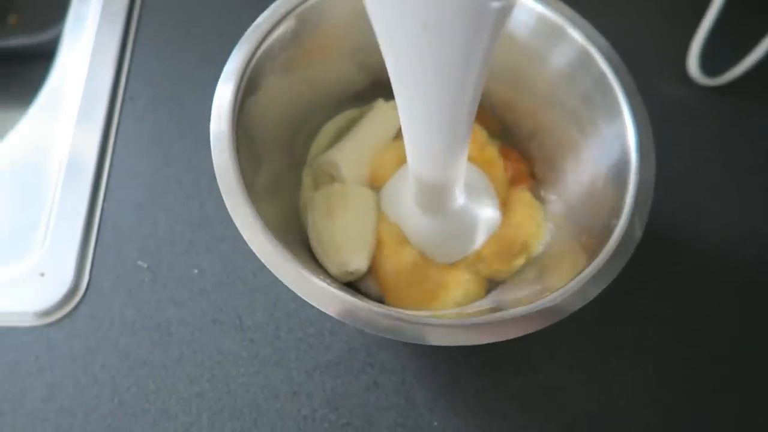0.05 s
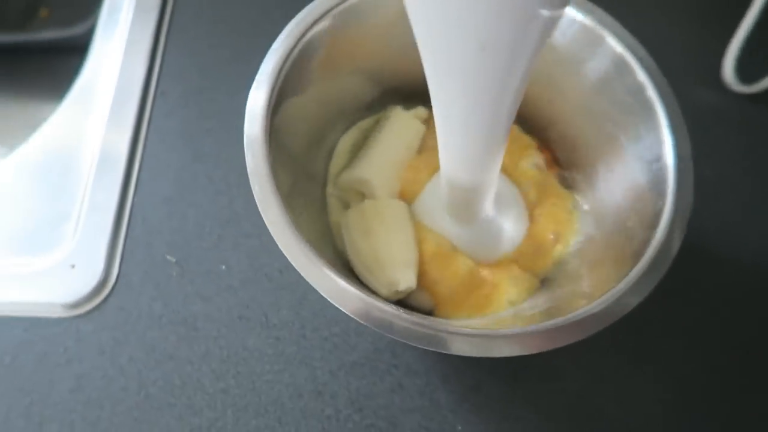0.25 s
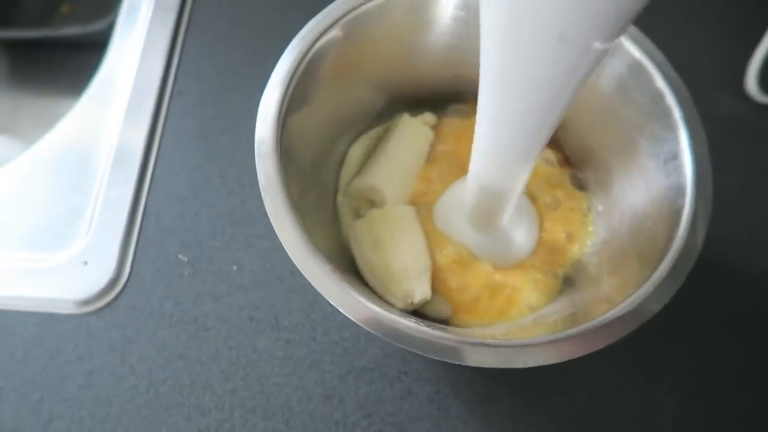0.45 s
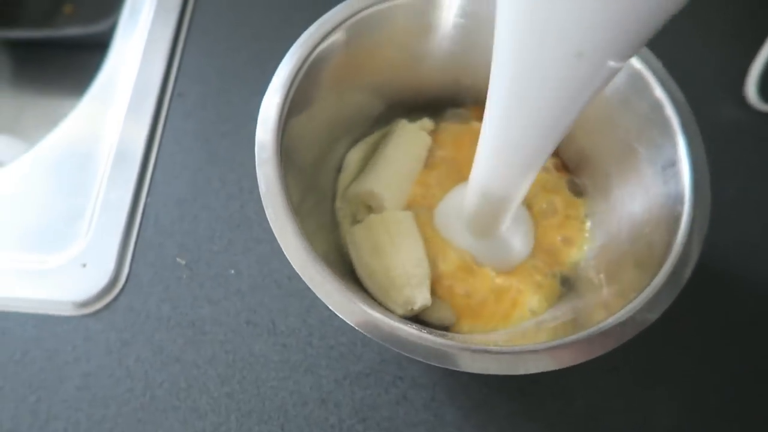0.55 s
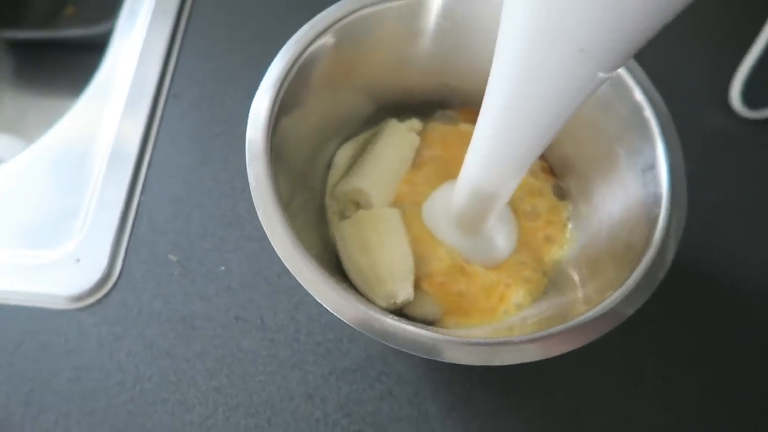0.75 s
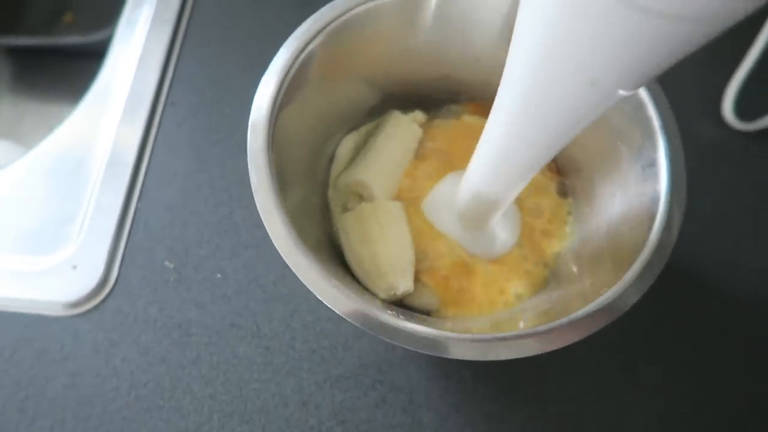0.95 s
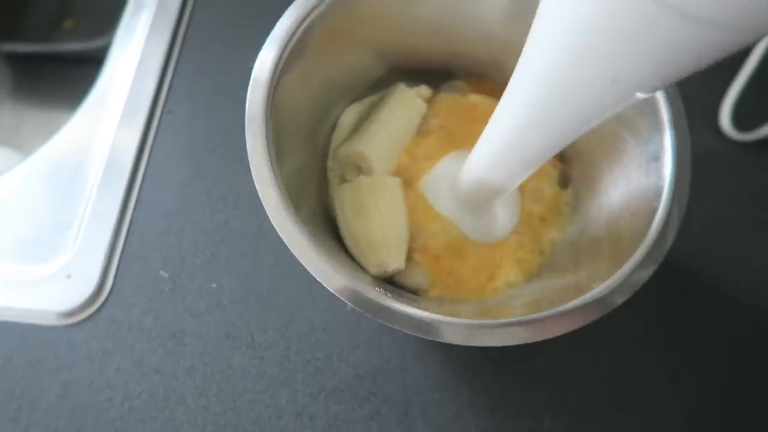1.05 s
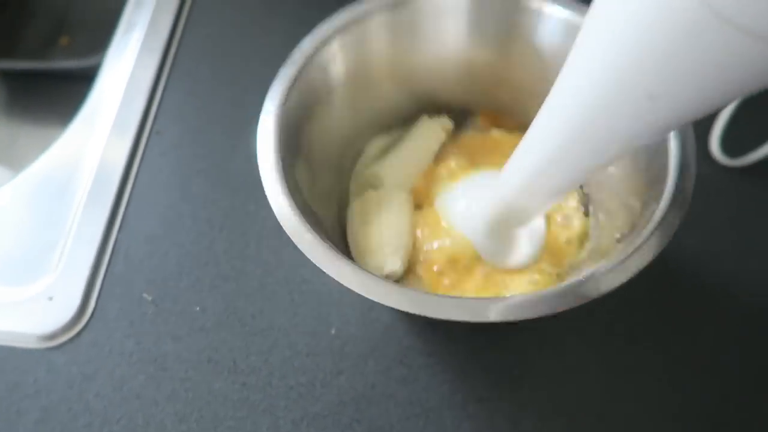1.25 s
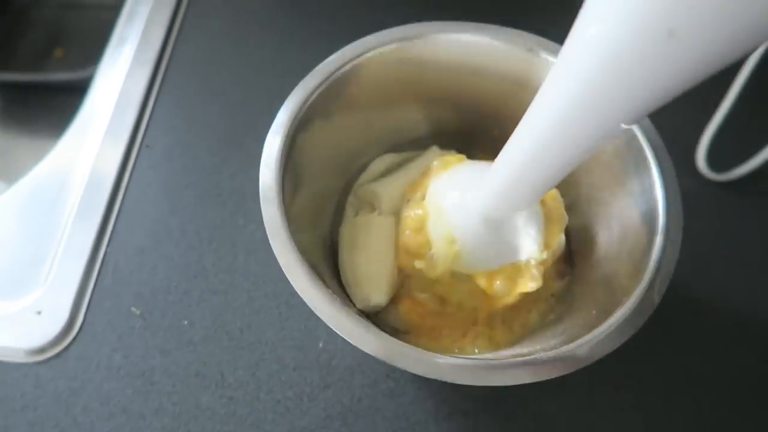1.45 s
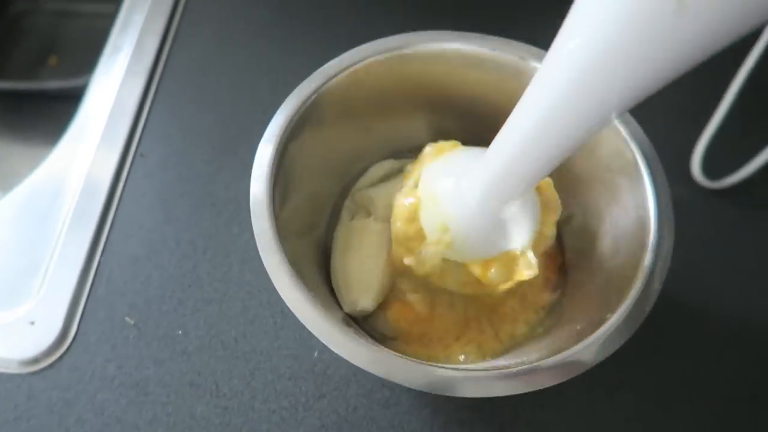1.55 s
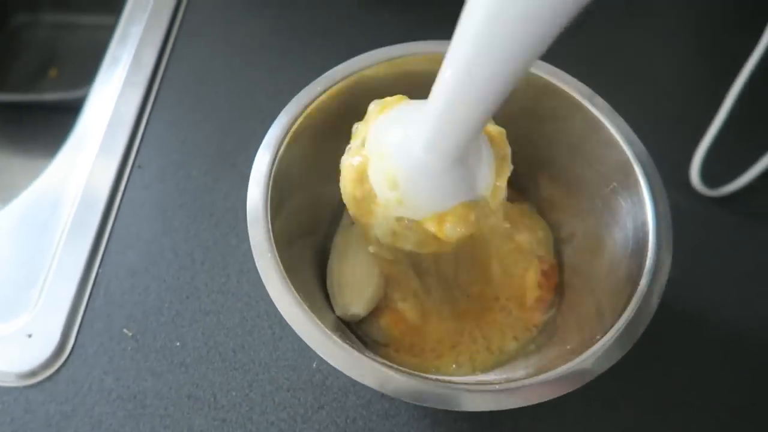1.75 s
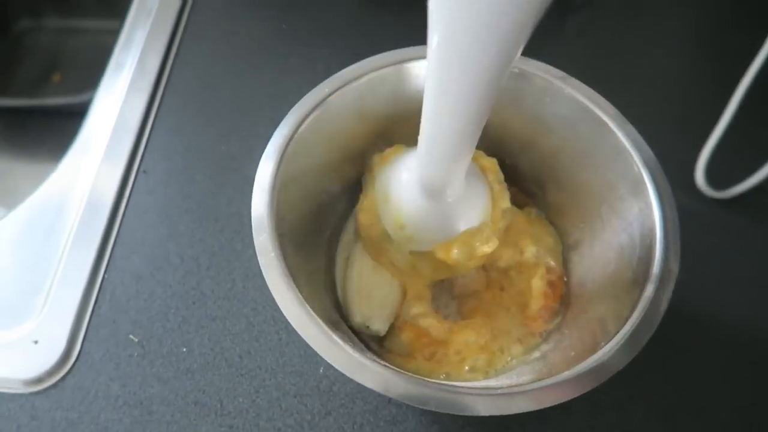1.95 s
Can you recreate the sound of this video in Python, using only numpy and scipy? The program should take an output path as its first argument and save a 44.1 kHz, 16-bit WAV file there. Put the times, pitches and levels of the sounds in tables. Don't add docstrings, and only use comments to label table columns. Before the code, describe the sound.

Handheld blender motor sags in pitch and cuts off, followed by a loud steel bowl knock

```python
import sys
import numpy as np
from scipy import signal
from scipy.fft import rfft, irfft, next_fast_len
from scipy.io import wavfile
from scipy.ndimage import map_coordinates

SR = 44100
rng = np.random.default_rng(int(sys.argv[2]) if len(sys.argv) > 2 else 0)


def field_ratio(decibels):
    return 10 ** (np.asarray(decibels, dtype=float) / 20)


def pcm_store(signal):
    levels = np.round(np.clip(np.atleast_2d(signal), -1, 1) * 32767)
    wavfile.write(sys.argv[1], SR, levels.astype(np.int16).T)


N = 88640
OFF_S = 0.7776


def unit(x):
    return x / np.sqrt(np.mean(x ** 2) + 1e-20)


def along(points, hz):
    f, v = np.transpose(points)
    return np.interp(np.log(hz + 1), np.log(f + 1), v)


def curves(rows):
    s, *cols = np.transpose(rows)
    return [np.interp(np.arange(N) / SR, s, c) for c in cols]


def wobble(rate):
    knots = rng.standard_normal(int(N * rate / SR) + 4)
    return map_coordinates(knots, [np.arange(N) * rate / SR])


def filtered(x, response):
    m = next_fast_len(N + SR // 2)
    return irfft(rfft(x, m) * response(np.fft.rfftfreq(m, 1 / SR)), m)[..., :N]


def peaks(rows, f):
    return sum(field_ratio(db) * 1j * f * w / (c * c - f * f + 1j * f * w) for c, w, db in rows)


def noise(spectrum, bumps=()):
    colour = lambda f: field_ratio(along(spectrum, f)) * (1 + peaks(bumps, f))
    return unit(filtered(rng.standard_normal(N), colour))


def add(out, s, x):
    part = out[round(s * SR):][:len(x)]
    part += x[:len(part)]


def glide(hz):
    return np.sin(2 * np.pi * np.cumsum(hz) / SR)


def tails(table, size):
    hz, t, z = signal.stft(rng.standard_normal((2, size)), SR, nperseg=256)
    decay = field_ratio(-60 * t / along(table, hz)[:, None])
    tail = signal.istft(z * decay, SR, nperseg=256)[1]
    return tail / np.linalg.norm(tail[0])


# (order, level [dB])
SHAFT_ORDERS = [(1, -6), (2, -9.5), (3, -4), (4, -4), (5, -6.5), (6, -11), (7, -6.5), (8, -15), (9, -6.5),
                (10, -19)]
# (centre [Hz], width [Hz], level [dB])
WORKTOP_MODES = [(112, 16, -3.5), (181, 100, 0.5), (345.7, 52, 7), (418, 58, 1.5), (500.7, 18, 1),
                 (900, 180, 1.5)]


def shaft_hum(hz, turn, mains, press_db):
    rough_db, flutter_rad, mains_depth = 1.6, 0.04, 0.3
    foot_mode = [(147, 22, 0)]
    hum = 0
    for order, db in SHAFT_ORDERS:
        f = order * hz
        shaken = np.abs(peaks(WORKTOP_MODES, f)) * np.clip(f / 95, 0, 1) ** 4
        pressed = field_ratio(press_db + 7.5) * np.abs(peaks(foot_mode, f)) ** 2
        level = field_ratio(db + rough_db * wobble(15.7)) * (shaken + pressed)
        pulse = 1 + mains_depth * (order > 2) * mains
        phase = order * (turn + flutter_rad * wobble(24.4)) + 7 * rng.random()
        hum = hum + level * pulse * np.sin(phase)
    return hum


# (frequency [Hz], level [dB per Hz])
CASING_COLOUR = [(24, -47), (45, -23.5), (150, -4.5), (400, -2.5), (1000, -7.5), (2000, -10), (3740, -23),
                 (5500, -16), (9890, -34.5), (15500, -45.5)]
# (centre [Hz], width [Hz], level [dB])
SHELL_MODES = [(1091, 250, 2.5), (1733, 200, 1), (2620, 770, -7.5), (7940, 150, 1.5)]


def casing_rattle(turn):
    gate = unit(1 + 0.5 * np.cos(turn))
    return noise(CASING_COLOUR, SHELL_MODES) * gate * field_ratio(0.98 * wobble(24))


# (centre [Hz], width [Hz], level over power [dB])
BRUSH_WHINES = [(4520, 270, -12), (9840, 460, -22.5)]


def brush_hiss(t, hz, mains):
    sag, whir_sag = 0.09, 0.43
    whine = 0
    for centre_hz, width_hz, db in BRUSH_WHINES:
        band = unit(wobble(width_hz) * glide(centre_hz * (hz / 90) ** sag))
        whine = whine + field_ratio(db + 0.87 * wobble(8)) * band
    whine = whine * (1 - 0.52 * np.exp(-t / 0.14))
    whir = field_ratio(-5) * np.exp(-t / 0.44) * wobble(1100) * glide(5800 * (hz / hz[0]) ** whir_sag)
    return unit(1 + 0.45 * mains) * (whine + whir)


# (frequency [Hz], level [dB per Hz])
PULP_COLOUR = [(60, -22.5), (150, -1.5), (400, 0), (1200, -10), (3200, -2.5), (6000, -17), (12000, -20),
               (15500, -31.5)]


def pulp_splash(slosh_db):
    drops_per_s, spread_db, surge_db = 2500, 3, 1.2
    drops = (rng.random(N) < drops_per_s / SR) * field_ratio(spread_db * rng.exponential(size=N))
    drop_decay = np.exp(-np.arange(300) / 41.0)
    spray = signal.fftconvolve(drops, drop_decay)[:N] * rng.standard_normal(N)
    wet = unit(filtered(spray, lambda f: field_ratio(along(PULP_COLOUR, f))))
    return field_ratio(slosh_db + surge_db * wobble(39.87)) * wet


# (time [s], level [dB], pitch [Hz])
POP_EVENTS = [(.0050, -11, 3400), (.0122, -13, 1900), (.0222, -13, 3300), (.047, -19, 2000),
              (.303, -16, 3200), (1.339, -31, 3000), (1.4478, -20, 1650), (1.9738, -48, 4500),
              (1.9740, -43, 2600), (1.9862, -45, 4500), (1.9865, -41, 2700)]


def pops():
    out, u = np.zeros(N), np.arange(400) / SR
    for s, db, hz in POP_EVENTS:
        swell = (u / 0.00039) * np.exp(1 - u / 0.00046)
        add(out, s, field_ratio(db) * np.sin(2 * np.pi * hz * u) * swell)
    return out


# (time [s], shaft turns [Hz], power [dB], slosh over power [dB], foot pressure on bowl [dB])
MOTOR_RUN = [(0, 115.8, -27, 0, 16), (.098, 108.3, -26, -7.5, 6), (.146, 101.8, -24, -14.5, 8),
             (.278, 88.28, -24.5, -10.5, 7), (.342, 86.7, -25.5, -6, 9), (.422, 73.12, -25, -11, -28),
             (.52, 69.23, -27, -4, -6), (.586, 71.66, -27, 0.5, 7), (.66, 73.14, -25.5, -1, 7),
             (.738, 76.1, -24.5, -2.5, -13), (.8, 76.4, -22, -6, -12)]


def blender():
    coast_t60_s, mains_hz = 0.11, 52.5
    t = np.arange(N) / SR
    hz, power_db, slosh_db, press_db = curves(MOTOR_RUN)
    turn = 2 * np.pi * np.cumsum(hz) / SR
    mains = np.cos(2 * np.pi * mains_hz * t + 0.72 * wobble(5.9))
    after = np.clip(t - OFF_S, 0, 9)
    layers = field_ratio(-5.5 - 50 * after) * shaft_hum(hz, turn, mains, press_db)
    layers += field_ratio(-1.0) * casing_rattle(turn)
    layers += brush_hiss(t, hz, mains)
    layers += pulp_splash(slosh_db)
    layers += field_ratio(-21 + 3 * wobble(29)) * mains
    return field_ratio(power_db - 60 * after / coast_t60_s) * layers + pops()


# (frequency [Hz], t60 [s])
KITCHEN_DECAY = [(100, 0.22), (300, 0.68), (1000, 0.19), (3000, 0.35), (8000, 0.067), (14000, 0.16)]


def kitchen(x):
    delayed = np.pad(x, (200, 0))[None]
    a, b = signal.fftconvolve(delayed, tails(KITCHEN_DECAY, size=SR // 2), axes=1)[:, :N]
    return a, b


# (frequency [Hz], t60 [s])
SCATTER_DECAY = [(100, .06)]


def nearby_scatter(x):
    return signal.fftconvolve(x, tails(SCATTER_DECAY, size=4096)[0])[:N]


# (frequency [Hz], level [dB per Hz])
FLOOR_COLOUR = [(15, -62.5), (25, -4.5), (66, 1), (95, -4), (301, -10.5), (558, -14), (3630, -25.5),
                (11200, -39), (15000, -53.5)]


def noise_floor(extra_db=0):
    return field_ratio(-60 + extra_db) * noise(FLOOR_COLOUR)


# (time [s], level [dB], pitch [Hz])
NUDGES = [
    (0.981, -52, 136),
    (1.029, -48, 64),
    (1.235, -43, 58.8),
    (1.294, -38.5, 302),
    (1.644, -53, 248),
    (1.846, -58, 249.4),
    (.775, -22, 326.4),
]
# (time [s], level [dB])
DRAG_LEVEL = [
    (.82, -38.5),
    (.9, -44.5),
    (1, -47.5),
    (1.13, -55.5),
    (1.2, -49.5),
    (1.3, -44.5),
    (1.34, -41.5),
    (1.365, -29),
    (1.385, -39.5),
    (1.404, -24),
]
# (frequency [Hz], level [dB per Hz])
SCRAPE_COLOUR = [(29, -41), (50, -2.5), (232, -2), (802, -9), (985, -10), (1390, -17), (2200, -14),
                 (12000, -36), (15600, -60.5), (22000, -120)]
# (centre [Hz], width [Hz], level [dB])
RUBBED_BOWL = [(980, 15, 9), (2310, 260, -18.5), (220, 30, -4.5)]


def drag():
    end_s, jerk_db = 1.41, 1.8
    t, (level_db,) = np.arange(N) / SR, curves(DRAG_LEVEL)
    moving = np.clip((t - OFF_S) / 0.03, 0, 1) * np.clip((end_s - t) / 0.004, 0, 1)
    out = moving * field_ratio(level_db + jerk_db * wobble(47)) * noise(SCRAPE_COLOUR, RUBBED_BOWL)
    for s, db, hz in NUDGES:
        nudge = np.sin(2 * np.pi * hz * t[:1800]) * np.hanning(1800)
        add(out, s - 0.02, field_ratio(db) * nudge)
    return out


# (time [s], peak level [dB], centre [Hz])
STRAND_TICKS = [
    (0.845, -29, 5997),
    (0.9715, -48, 6000),
    (1.2276, -39, 6150),
    (1.4894, -48, 6000),
    (1.5127, -62, 5965),
    (1.6359, -44, 5740),
]


def ticks():
    out, u = np.zeros(N), np.arange(600) / SR
    for s, db, centre_hz in STRAND_TICKS:
        band = signal.butter(2, [centre_hz / 2.9, min(centre_hz * 1.6, 20000)], "band", fs=SR)
        burst = signal.lfilter(*band, rng.standard_normal(len(u)))
        add(out, s, field_ratio(db - 6.5 - 60 * u / 0.047) * burst)
    return out


# (time [s], level [dB], top [Hz])
CONTACTS = [(1.3167, -25.5, 2980), (1.3383, -25, 4000), (1.3484, -8.5, 400), (1.3565, -14, 348),
            (1.368, -11.5, 350), (1.362, -10, 3510), (1.3976, -10, 4000), (1.4021, -17, 2500),
            (1.4043, 18, 4550), (1.4473, -16, 1970), (1.471, -30.5, 904), (1.5116, -21.5, 4920),
            (1.515, -14, 450), (1.525, -14, 399), (1.5517, -16, 450), (1.578, -23, 298), (1.614, -32, 404),
            (1.644, -34, 400), (1.708, -45.5, 1480), (1.973, -37, 2930), (1.9854, -35.5, 3100),
            (1.9908, -28, 1530), (1.9937, -17, 350), (1.999, -32.5, 1293), (2.003, -8.5, 343),
            (2.0065, -7.5, 338)]
# (pitch [Hz], level [dB], t60 [s])
STRUCK_MODES = [(145, -16, 0.049), (216, -2, 0.035), (356, 0.5, 0.035), (489, -0.5, 0.04),
                (627, -7.5, 0.045), (707, -3, 0.033), (903.6, 6.5, 0.025), (1204, -3, 0.022),
                (1785, -7, 0.02), (2064, -12.5, 0.036), (2324, -12.5, 0.037), (2600, -10, 0.048),
                (2938, -11.5, 0.022), (4150, -18.5, .01)]
# (frequency [Hz], t60 [s])
SHUDDER_DECAY = [(100, 0.58), (300, 0.51), (1000, 0.45), (3000, 0.37), (6000, 0.24), (14000, 0.085)]
# (frequency [Hz], level [dB])
SHUDDER_TONE = [(60, -18), (140, -6), (300, 1), (550, 1), (900, 1), (1700, 1), (3000, -5.5), (5000, 3.5),
                (9000, 12)]


def knocks():
    crack_t60_s, shudder_db = 0.004, -25.5
    out, u = np.zeros(N), np.arange(SR // 3) / SR
    for s, db, top_hz in CONTACTS:
        ring = 0
        for k, (hz, level, t60) in enumerate(STRUCK_MODES):
            decay = field_ratio(level + rng.normal(0, 1) - 60 * u / t60)
            ring = ring + decay * np.sin(2 * np.pi * hz * u) * (-1) ** (k + 1)
        crack = field_ratio(-60 * u / crack_t60_s) * rng.standard_normal(len(u))
        softness = signal.butter(2, min(top_hz, 20000), fs=SR)
        add(out, s, field_ratio(db - 11.5) * signal.lfilter(*softness, ring + crack))
    rough = out * (1 + 1.8 * wobble(2200))
    shudder = signal.fftconvolve(rough, tails(SHUDDER_DECAY, size=SR // 2)[0])[:N]
    return out + field_ratio(shudder_db) * filtered(shudder, lambda f: field_ratio(along(SHUDDER_TONE, f)))


# (pitch [Hz], level [dB], t60 [s])
RIM_MODES = [(1700, -3, 0.078), (1867, -1, .05), (2703, -6, 0.21), (4436, -3.5, 0.037)]
# (time [s], level [dB])
RIM_HITS = [
    (1.3629, -35),
    (1.399, -25.5),
    (1.4037, -21.5),
    (1.4483, -40.5),
    (1.5106, -48),
    (1.975, -55),
    (1.986, -48.5),
    (1.9928, -45.5),
    (1.999, -50),
]


def rim():
    out, u = np.zeros(N), np.arange(SR // 3) / SR
    for s, db in RIM_HITS:
        for hz, level, t60 in RIM_MODES:
            decay = field_ratio(level + rng.normal(0, 1.6) - 60 * u / t60)
            add(out, s, field_ratio(db) * decay * np.sin(2 * np.pi * hz * u))
    return out


# (frequency [Hz], left over right [dB])
PORT_LEAN = [(30, 2.5), (70, -1.5), (200, 1.5), (380, 2.5), (700, 0), (15000, -.3)]
# (frequency [Hz], side level [dB])
PORT_APART = [(60, -18), (500, -15), (1500, -15.5), (4000, -18), (8000, -12.5), (13000, -0.5)]


def ports(x, other):
    side = filtered(other, lambda f: field_ratio(along(PORT_APART, f)))
    halves = np.array([[0.5], [-0.5]])
    return filtered(np.array([x + side, x - side]), lambda f: field_ratio(along(PORT_LEAN, f) * halves))


def scene():
    motor = blender()
    small = drag() + ticks()
    hits = knocks() + rim()
    a, b = kitchen(field_ratio(-13.5) * (motor + small) + field_ratio(-24.5) * hits)
    scatter = nearby_scatter(motor + field_ratio(6) * small + field_ratio(1.5) * hits)
    middle = motor + small + hits + a + noise_floor()
    return ports(middle, scatter + b + noise_floor(extra_db=13))


def narrow(x):
    keep_above_db, always_below_hz = -12.5, 698
    mid_side = np.array([x[0] + x[1], x[0] - x[1]]) / 2
    hz, _, (mid, side) = signal.stft(mid_side, SR, nperseg=2048)
    band = np.unique(np.round(np.log(hz + 300) * 7), return_inverse=True)[1]
    members = band == np.arange(band.max() + 1)[:, None]
    power = lambda z: members @ np.abs(z) ** 2
    strong = power(side) > field_ratio(2 * keep_above_db) * power(mid)
    side = side * (strong[band] | (hz < always_below_hz)[:, None])
    return signal.istft(np.array([mid + side, mid - side]), SR, nperseg=2048)[1][:, :N]


def roll_off(x):
    return signal.sosfilt(signal.butter(12, 16060, fs=SR, output="sos"), x)


# (frequency [Hz], level [dB])
MIC_RESPONSE = [(20, -6.5), (50, 0), (12600, 0), (12900, -8.5), (14500, -9.5), (15800, -20.5)]


def record(dry):
    clip, knee = 0.98, 50
    x = filtered(dry, lambda f: field_ratio(along(MIC_RESPONSE, f)))
    overloaded = x / (1 + np.abs(x / clip) ** knee) ** (1 / knee)
    return roll_off(narrow(overloaded))


dry = scene()
out = record(dry)
pcm_store(out)
```